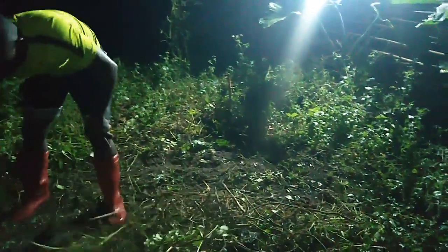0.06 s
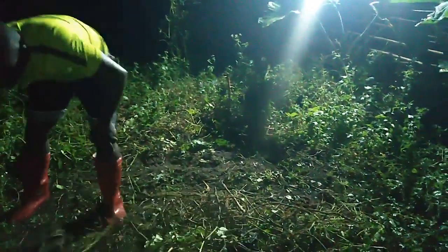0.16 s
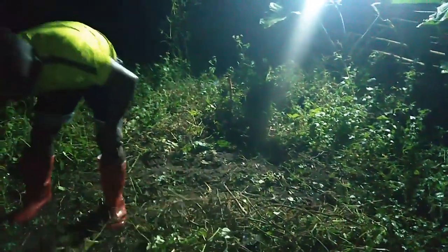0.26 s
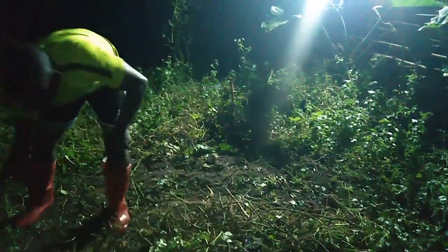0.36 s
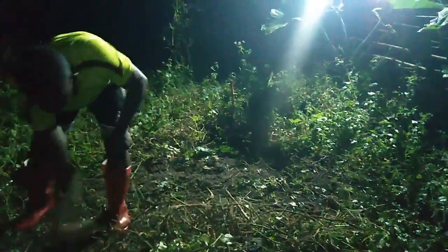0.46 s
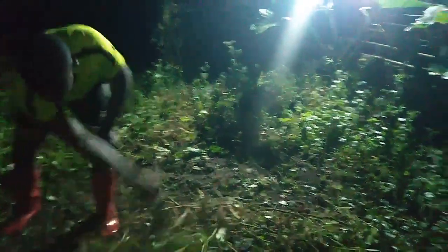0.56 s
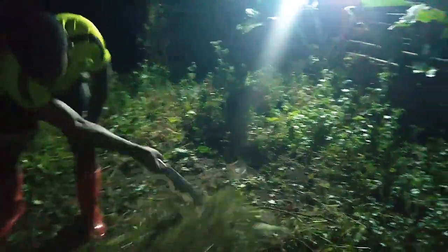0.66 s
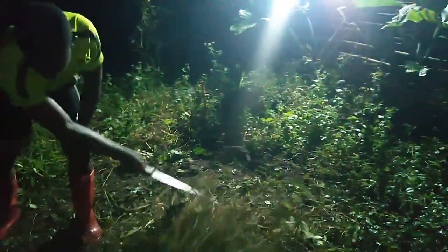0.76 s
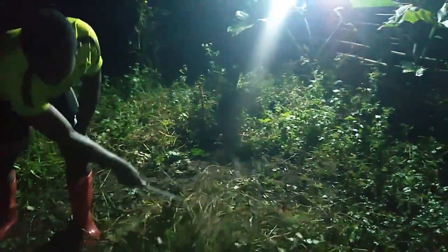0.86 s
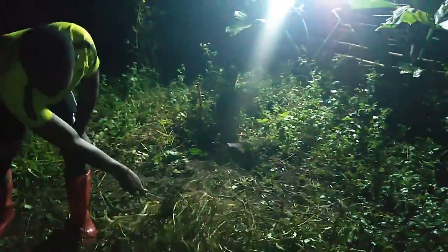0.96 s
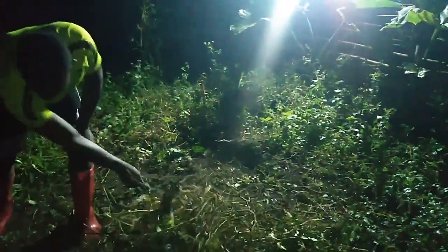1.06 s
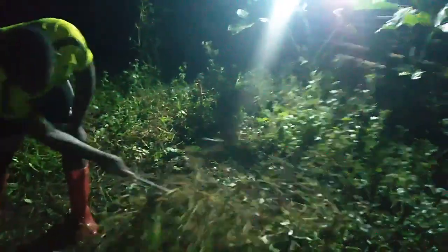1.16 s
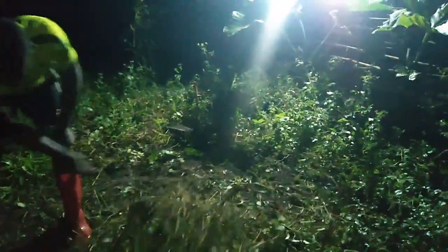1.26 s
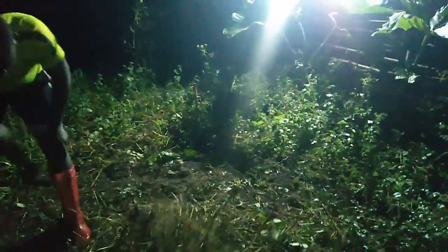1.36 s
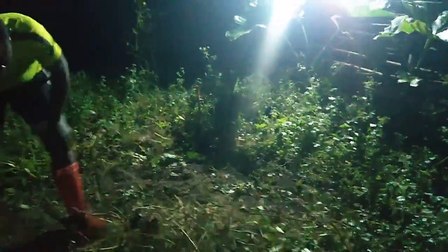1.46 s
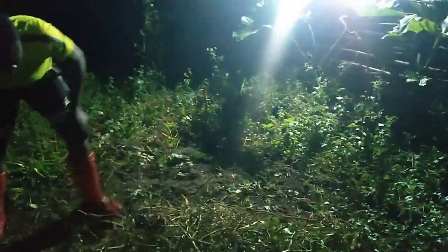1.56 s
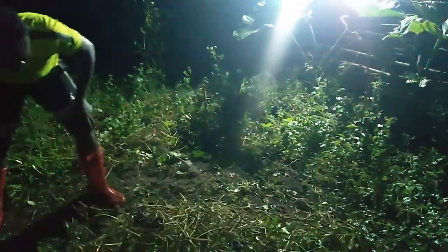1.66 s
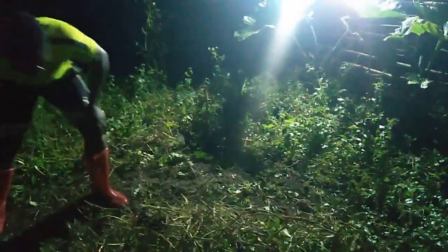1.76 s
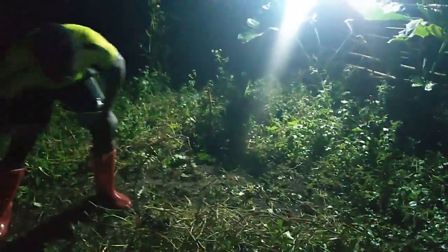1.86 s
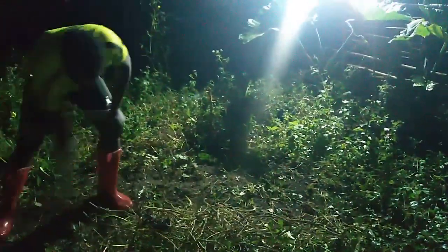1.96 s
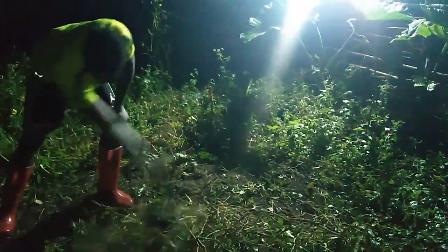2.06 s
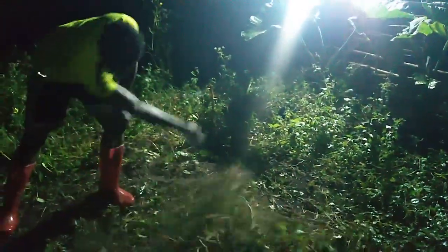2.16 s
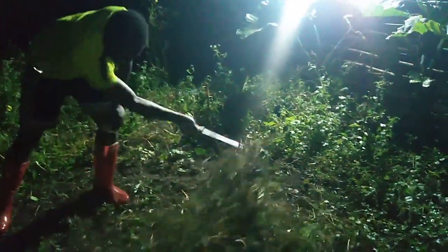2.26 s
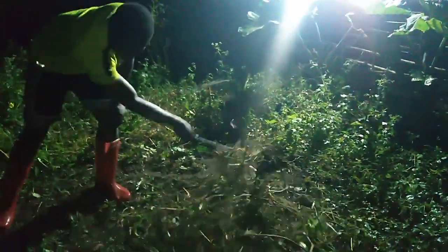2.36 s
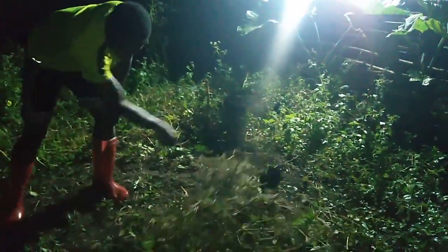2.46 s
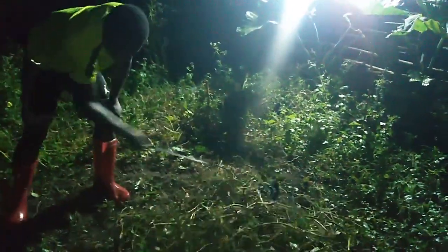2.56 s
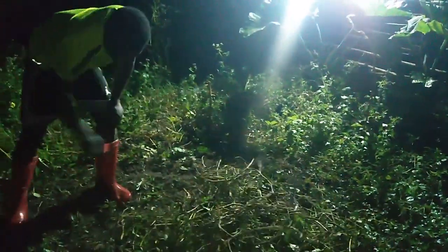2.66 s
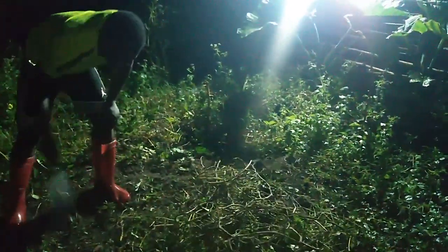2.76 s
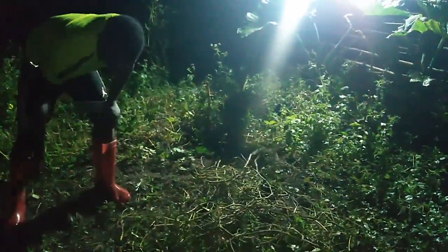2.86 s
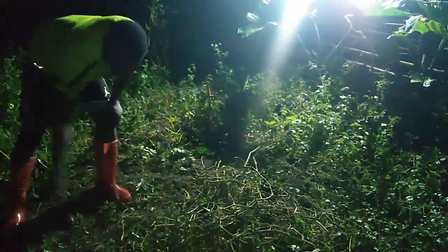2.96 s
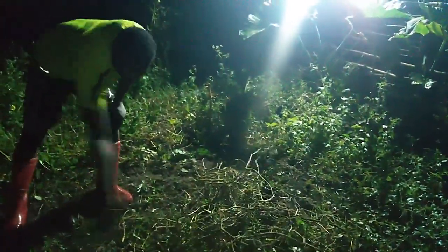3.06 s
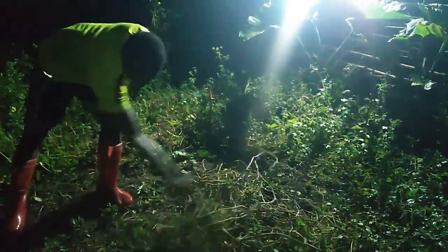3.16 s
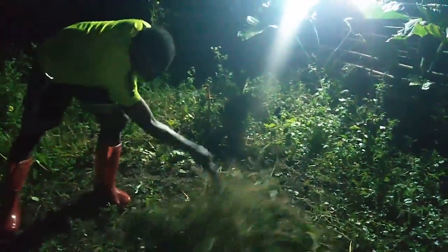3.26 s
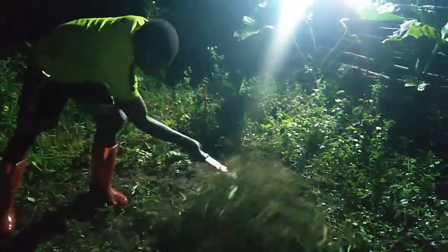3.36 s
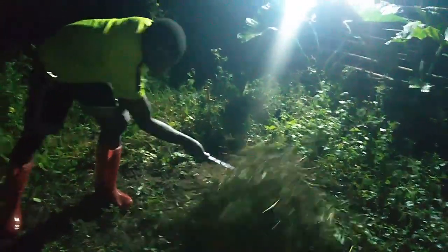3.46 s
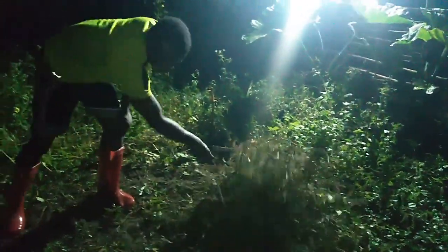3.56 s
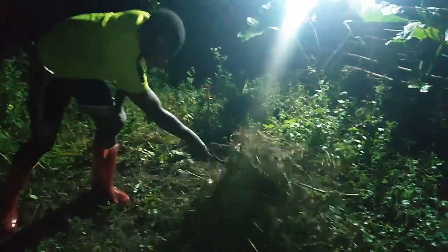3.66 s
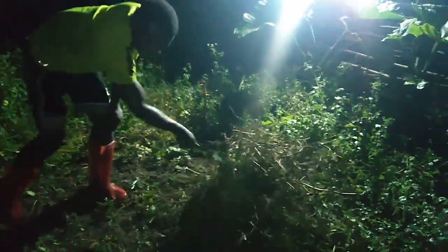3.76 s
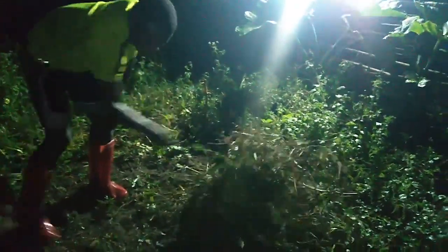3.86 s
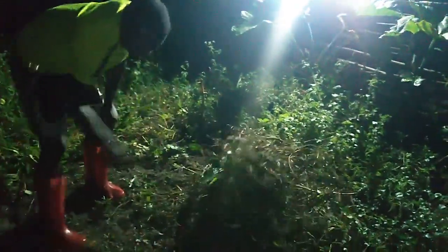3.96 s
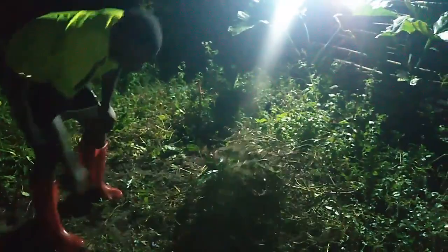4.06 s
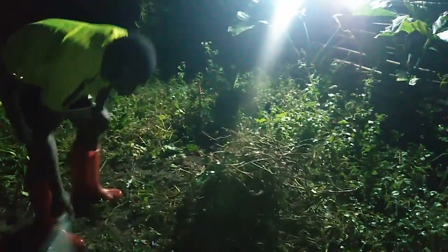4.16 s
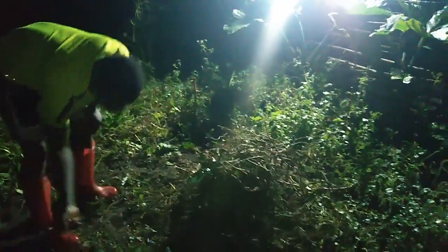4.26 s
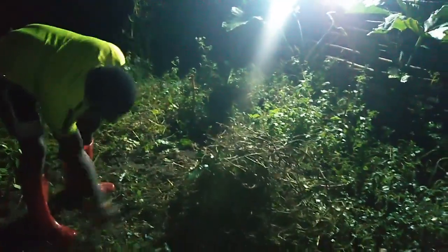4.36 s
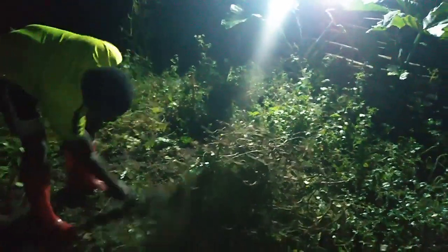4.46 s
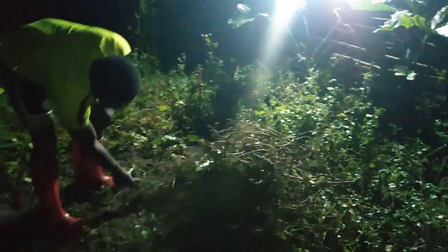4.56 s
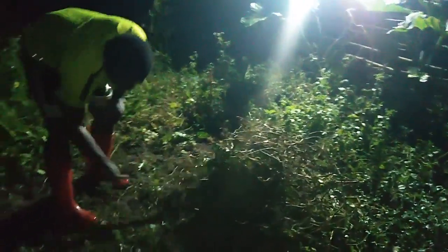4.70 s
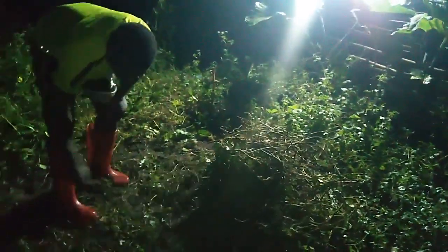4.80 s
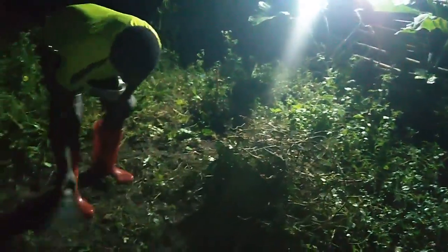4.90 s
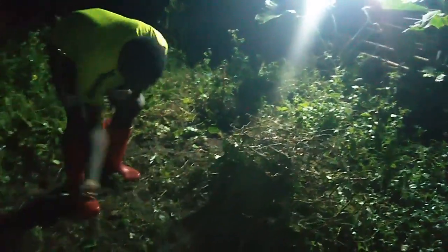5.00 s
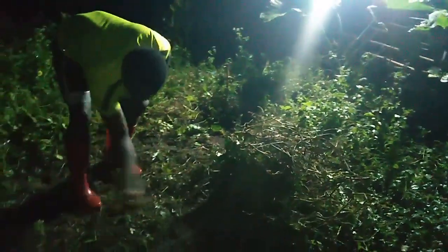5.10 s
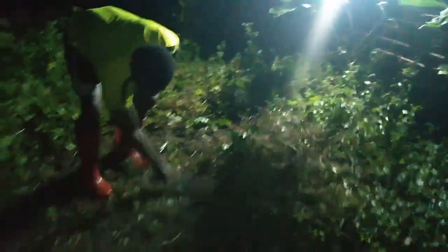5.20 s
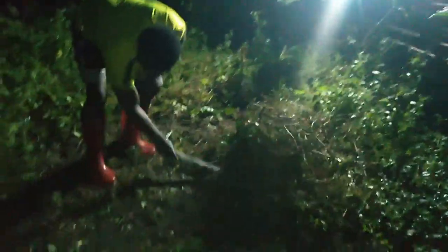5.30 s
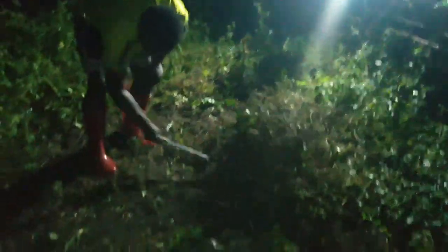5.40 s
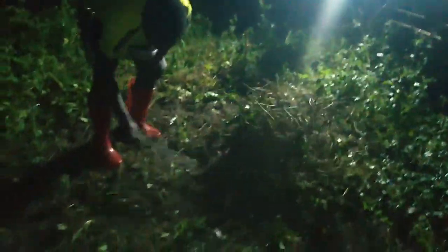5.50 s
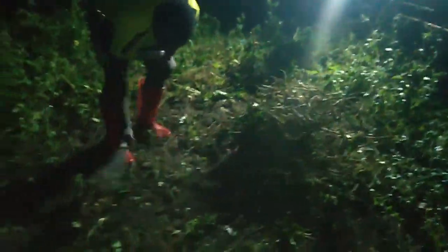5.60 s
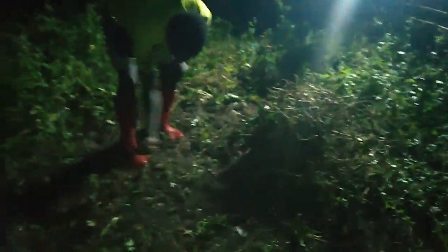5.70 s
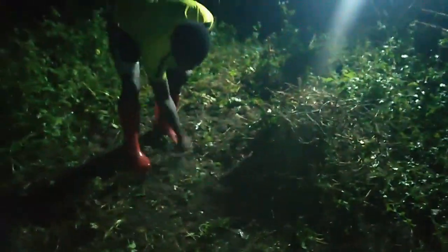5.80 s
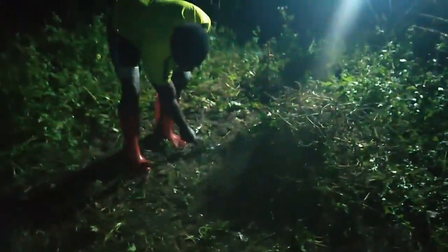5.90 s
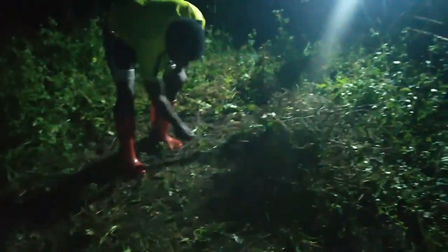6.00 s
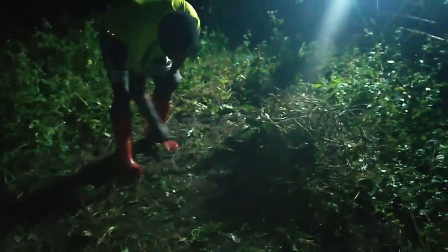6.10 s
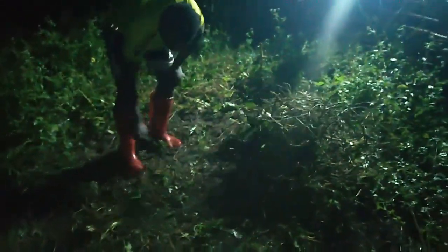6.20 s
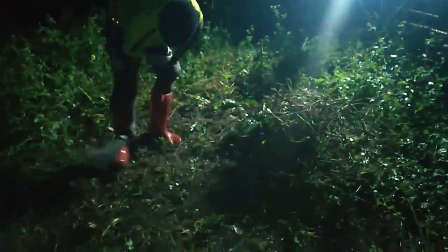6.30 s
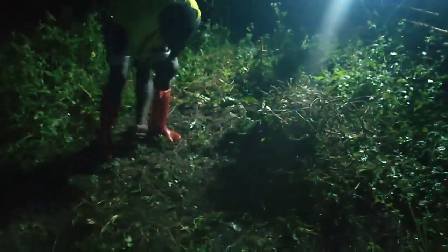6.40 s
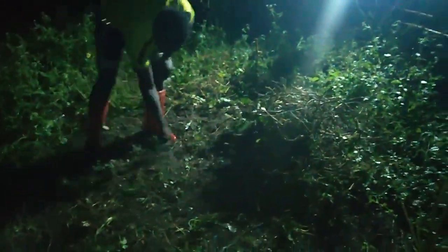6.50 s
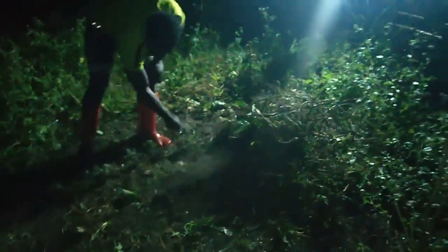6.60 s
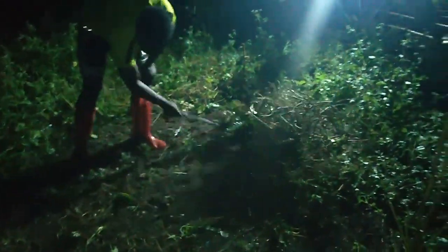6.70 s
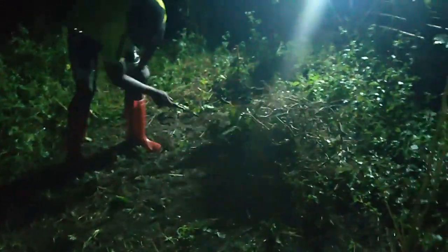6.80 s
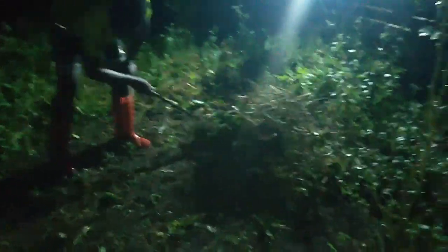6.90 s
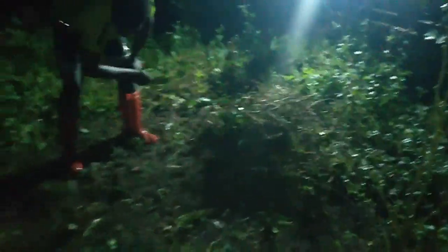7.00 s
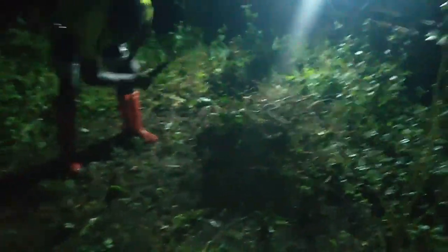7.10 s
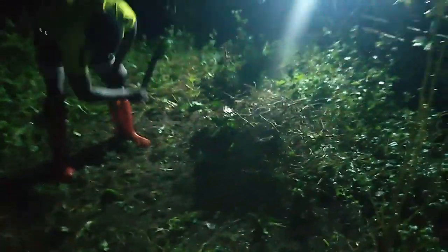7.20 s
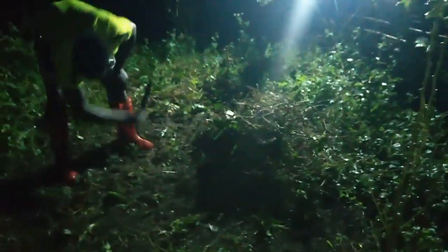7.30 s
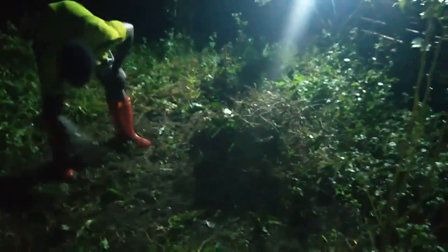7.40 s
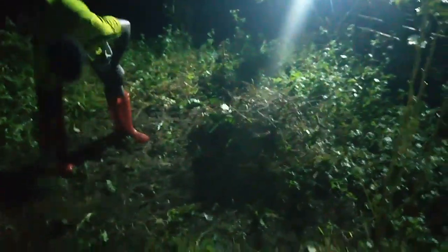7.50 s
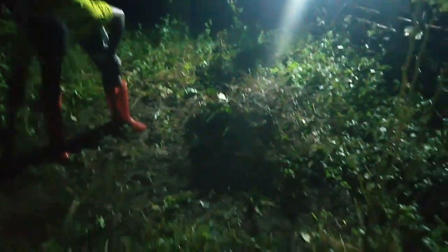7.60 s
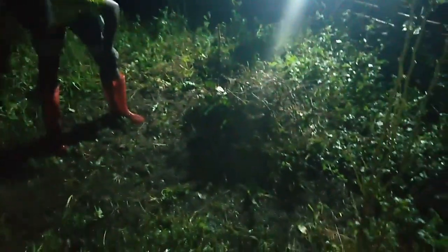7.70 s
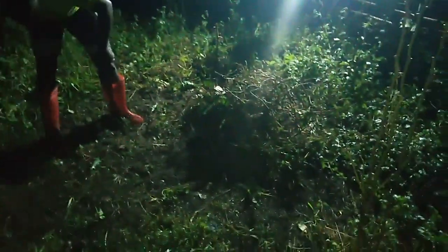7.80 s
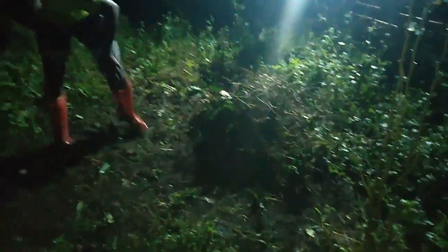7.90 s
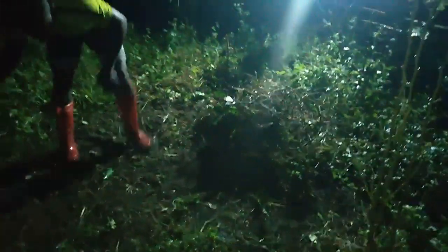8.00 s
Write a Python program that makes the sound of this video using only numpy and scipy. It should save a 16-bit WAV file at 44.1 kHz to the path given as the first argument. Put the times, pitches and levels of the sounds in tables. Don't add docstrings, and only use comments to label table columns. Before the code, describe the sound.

Open ground at night, heard through a handheld phone close to the weeds. From the start an insect on the left chirrs in fast, thin, very high pulses, about 45 a second, over a faint hissy far chorus and low air and traffic rumble. Light litter settles first. At 0.5 s a blade slashes, a sharp bright leafy rip with a stem snap, then falling debris. More slashes land at 2.1 and 3.2 s, the latter into crunchy stems with a long shower of bits. Soft scuffs, dull knocks and faint hollow frog hoots fill the gaps. Hard strokes follow at 4.5 and 5.2, a light flick at 5.8, a heavy thumping one at 5.9, another at 6.6 with grit pattering. A neighbour insect tries short fluttering notes at 1.8 and around 7.4. The loudest, overloaded slash hits at 7.55, then debris fades under the chirring to about 8 s.

```python
import sys
import numpy as np
from scipy import signal
from scipy.fft import rfft, irfft, next_fast_len
from scipy.io import wavfile
from scipy.ndimage import uniform_filter1d

SR = 44100
rng = np.random.default_rng(int(sys.argv[2]) if len(sys.argv) > 2 else 0)


def inscribe(sig):
    pcm = np.round(np.clip(np.atleast_2d(sig).T, -1, 1) * 32767)
    wavfile.write(sys.argv[1], SR, pcm.astype(np.int16))


def boost(x):
    u = np.asarray(x, float) / 20
    return 10 ** u


N = 355005


def evened(x):
    return x / np.sqrt(np.mean(x ** 2) + 1e-20)


def read(points, hz):
    f, value = np.transpose(points)
    return np.interp(np.log(hz + 1), np.log(f + 1), value)


def over_time(points):
    s, value = np.transpose(points)
    return np.interp(np.arange(N) / SR, s, value)


def drift(per_s):
    lowpass = signal.butter(2, per_s, fs=SR, output="sos")
    return evened(signal.sosfilt(lowpass, rng.standard_normal(N + SR))[SR:])


def bump(s, length):
    return np.exp(-(2 * (np.arange(N) / SR - s) / length) ** 2)


def ring(x, hz, width):
    r = np.exp(-np.pi * width / SR)
    poles = [1, -2 * r * np.cos(2 * np.pi * hz / SR), r * r]
    once = signal.lfilter([1, 0, -1], poles, x)
    return evened(signal.lfilter([1], poles, once))


def patches(shape):
    field = rng.standard_normal(shape[::-1]).T
    field = uniform_filter1d(field, size=5, axis=-2)
    return evened(uniform_filter1d(field, size=17, axis=-1))


def patchy(left, right, same, patch_db):
    frames, hz = N // 256 + 5, np.fft.rfftfreq(1024, 1 / SR)
    a, b, c, d = rng.standard_normal((frames, 513, 4)).T
    same = np.clip(same, -1, 1)
    first, other = a + 1j * b, c + 1j * d
    z = np.array([first, same * first + np.sqrt(1 - same ** 2) * other])
    colour_db = np.array([read(left, hz), read(right, hz)])[..., None]
    z *= boost(colour_db + patch_db * patches(a.shape))
    sound = signal.istft(z, nperseg=1024, noverlap=768)[1][:, :N]
    return np.array([evened(v) for v in sound])


def night_air():
    # (f/Hz, level/dB per Hz)
    rumble = [(12, -77), (20, -36), (32, -67.5), (68, 3.5), (97, 7.5), (119, 1), (145, 2), (300, -17.5),
              (405, -28.5), (450, -57), (580, -26.5), (990, -120)]
    # (t/s, level/dB, length/s)
    gusts = [(0.545, -37, 0.029), (1.737, -40, 0.13), (3.24, -37, .04), (2.08, -34, 0.04),
             (4.11, -34.5, .1), (4.094, -35, 0.25), (4.344, -40, .1), (5.918, -23, 0.011),
             (7.004, -39, 0.093), (7.554, -41, .06), (8.003, -43.5, 0.5)]
    steady_db = -43
    swells = sum(boost(2 * db) * bump(s, length) for s, db, length in gusts)
    level = np.sqrt(boost(2 * steady_db) + swells)
    return level * patchy(rumble, rumble, 0.88, patch_db=2.0)


def swept(strokes, hz):
    stroke_s = .009
    t = np.arange(0, stroke_s, 1 / SR)
    teeth = np.hanning(len(t)) * np.sin(2 * np.pi * hz * t)
    return signal.oaconvolve(strokes, teeth / abs(teeth).sum() * 1.6)[:N]


def insect():
    # (t/s, level/dB)
    upper_level = [(0.0, -24.5), (0.61, -25), (1.05, -28), (1.63, -23.5), (1.73, -33), (1.82, -24.5),
                   (2.38, -27.5), (3.38, -25.5), (4.08, -28.5), (5.2, -26.5), (5.63, -31.5), (5.96, -22),
                   (6.14, -31.5), (6.41, -34), (6.7, -27.5), (7.17, -31), (7.6, -23), (8.05, -28.5)]
    # (t/s, level/dB)
    lower_level = [(0.0, -36.5), (0.49, -32), (0.99, -37), (1.46, -29.5), (1.7, -36.5), (2.2, -32),
                   (2.42, -34), (3.47, -36), (3.81, -34.5), (4.12, -34.5), (5.96, -38), (6.1, -43.5),
                   (7.69, -32.5), (8.05, -34)]
    # (f/Hz, width/Hz, level/dB)
    upper_wing = [(7105, 95, 11), (6933, 46, 3.5), (8130, 110, -12.5)]
    # (f/Hz, width/Hz, level/dB)
    lower_wing = [(6132, 43, 17.5), (5951, 63, 16), (6200, 49, -15.5), (6220, 110, 19)]
    pulses_per_s, lowest_hz = 45.2, 5600
    upper_rough, lower_rough = 2.0, 1.1

    turns = np.cumsum(pulses_per_s * (1 + 0.0053 * drift(2.2) + .004 * drift(30))) / SR
    strokes = evened(np.diff(np.floor(turns), prepend=0) * boost(2.0 * drift(15)))
    scrape = evened(np.exp(-(turns % 1) / .7) * rng.standard_normal(N))
    near = 0
    for wing, level, rough in [(upper_wing, upper_level, upper_rough), (lower_wing, lower_level, lower_rough)]:
        rings = 0
        for hz, width, mode_db in wing:
            rings = rings + boost(mode_db) * ring(swept(strokes, hz) + rough * scrape, hz, width)
        near = near + boost(over_time(level) + 7.5 + 1.0 * drift(6.2)) * evened(rings)
    near = signal.sosfilt(signal.butter(6, lowest_hz, "high", fs=SR, output="sos"), near)
    return near * boost([[0], [-32]])


def chorus():
    # (f/Hz, level/dB per Hz)
    left_hiss = [(5400, -58), (5700, 7.5), (6300, 10), (6800, 25), (7400, 8.5), (8100, 7.5), (8400, -29),
                 (8900, -57.5)]
    # (f/Hz, level/dB per Hz)
    right_hiss = [(5000, -42.5), (5600, -34), (6100, 1), (6700, 9), (7400, -41.5), (8000, -20),
                  (8400, -24.5), (8900, -55)]
    out, t = np.zeros((2, N + 800)), np.arange(800) / SR
    for port, when, pitch, size in rng.random((300, 4)):
        note = np.sin(2 * np.pi * (6050 + 1650 * pitch) * t) * np.hanning(len(t))
        out[int(2 * port), int(when * N):][:len(t)] += note * boost(2.0 - 1.2 * np.log(size + .02))
    hiss = patchy(left_hiss, right_hiss, .05, patch_db=-6.5)
    return boost([[-38], [-45]]) * hiss + boost([[-33], [-40]]) * out[:, :N]


def spread(db, mix, weight_db):
    weight_share = np.array((.3, 0.62, 1.12))
    over_leaf_db = mix + weight_db * weight_share
    return boost(2 * db) * boost(2 * np.array([0, *over_leaf_db]))[:, None]


def layer_levels():
    # (t/s, blow level/dB, fade/dB per s, weight/dB)
    blows = [
        (0.532, -18, 152.5, -1),
        (2.107, -17, 136.5, -1.5),
        (3.218, -19, 191, 0),
        (4.479, -14.5, 194, -4),
        (5.225, -14, 119, 0),
        (5.782, -31.5, 903, -6),
        (5.906, -13, 136, 3),
        (6.6, -14, 149, -3),
        (7.558, -11, 185.5, -4),
    ]
    # (level/dB, lasts/s, weight/dB)
    litters = [
        (-26, 1.1, -4),
        (-24, 0.55, 0.5),
        (-25.5, 0.765, 1),
        (-23.5, 1.1, 1.5),
        (-27, 0.688, -0.5),
        (-34.5, 0.44, 1.5),
        (-43, 0.1, -7.5),
        (-36.5, 0.54, -7),
        (-32.5, 0.605, -3.5),
        (-35.5, .6, -3.5),
    ]
    # (t/s, leaf level/dB, length/s, weight/dB)
    rustles = [(0.005, -49, 0.0067, -20), (0.256, -37.5, 0.14, 4), (0.522, -40, .015, -8),
               (0.73, -28.5, 0.032, 2.5), (1.136, -40.5, 0.022, -11), (1.3, -45, 0.36, 4.5),
               (1.475, -55, 0.42, 13), (2.097, -35, 0.007, 0), (2.133, -13, 0.021, -4),
               (2.591, -37.5, 0.15, 2.5), (3.21, -25, 0.0043, 9), (3.242, -20, 0.012, 14),
               (3.596, -47, 0.22, 0), (4.045, -45.5, 0.12, 17.5), (4.443, -47.5, .025, 5),
               (4.475, -22, .006, -8), (5.143, -52, 0.0197, -19), (5.201, -43, .025, -9),
               (5.22, -30.5, 0.011, 9), (5.909, -26, 0.0046, -0.5), (0.55, -11, 0.0086, -16),
               (5.863, -59, 0.06, -36), (6.483, -39.5, 0.04, 11), (6.55, -45.5, .08, 7.5),
               (6.59, -27.5, 0.0041, -1), (6.992, -44, 0.11, -3.5), (7.13, -57, 0.085, -23),
               (7.3, -55.5, 0.016, -16.5), (7.551, -26, 0.0067, 0), (7.554, -18, 0.0034, 5),
               (6.662, -25.5, 0.011, 2), (6.697, -28.5, 0.009, 7.5), (7.674, -33, 0.0081, -1),
               (7.70, -34, 0.0083, 2), (7.79, -49, .05, -13)]
    # (t/s, length/s, stems level/dB, soil level/dB)
    scuffs = [(1.4, 0.034, -40, -58), (1.674, 0.063, -70, -54.5), (1.775, 0.073, -54, -55.5),
              (6.67, 0.12, -37, -47.5), (5.7, 0.064, -52.5, -64), (4.04, 0.049, -52, -41.5),
              (5.11, .1, -57, -72), (5.197, 0.005, -23, -53), (5.38, 0.089, -32, -49),
              (6.6, 0.064, -45, -55), (5.83, 0.046, -51.5, -74.5), (5.8, .04, -44, -80),
              (6.514, 0.048, -40, -55), (7.9, 0.15, -46, -82), (9, .06, -42, -71), (1.21, .15, -48, -59.5),
              (1.75, .12, -59, -51.5), (6.15, 0.095, -50, -61.5), (6.9, .2, -56, -64.5),
              (4.455, 0.013, -44, -71), (4.597, .01, -35, -60)]
    blow_mix, chop_mix = (-1, -10.5, -21.5), (-2.4, -1.7, -12)
    litter_mix, rustle_mix = (0, -1.2, -13), (-3.5, -6, -18.5)
    bite_db_per_s, thin_db_per_s, settle_db_per_s = 4000, 39, 205.5
    chop_db, chop_s = 0.5, 0.012
    earlier_s = -0.28

    power, clock = np.full((4, N), 1e-10), np.arange(N) / SR
    for s, db, fade, weight_db in blows:
        bite_db = bite_db_per_s * np.minimum(clock - s, 0)
        after = np.maximum(clock - s, 0)
        power += spread(db + bite_db - fade * after, blow_mix, weight_db)
        power += spread(db + bite_db + chop_db - 10 * (after / chop_s) ** 2, chop_mix, weight_db)
    starts = [earlier_s] + [row[0] for row in blows]
    for s, (db, lasts, weight_db) in zip(starts, litters):
        bite_db = bite_db_per_s * np.minimum(clock - s, 0)
        after = np.maximum(clock - s, 0)
        thin_db = thin_db_per_s * after + settle_db_per_s * np.maximum(after - lasts, 0)
        power += spread(db + bite_db - thin_db, litter_mix, weight_db)
    for s, db, length, weight_db in rustles:
        power += spread(db, rustle_mix, weight_db) * bump(s, length)
    for s, length, stems_db, soil_db in scuffs:
        power[2:] += boost(2 * np.array([[stems_db], [soil_db]])) * bump(s, length)
    return 10 * np.log10(power)


def litter_spectrum(hz, size):
    # (f/Hz, level/dB per Hz)
    litter_colour = [(90, -39), (200, -19), (450, -16.5), (700, -20.5), (2000, -18), (2650, -15.5),
                     (3200, -14), (4500, -15), (7000, -7), (10000, -6), (13500, -8.5), (15300, -26.5),
                     (16000, -43.5)]
    # (f/Hz, left over right/dB)
    port_lean = [(500, -0.5), (2400, -2.5), (4400, 0), (7000, 0), (9000, 5), (15000, 3.5)]
    # (f/Hz, left-right likeness/1)
    port_same = [(150, 0.46), (640, 0.81), (1400, 0.55), (3000, 0.55), (6000, 0.25), (12000, 0.24)]
    # (f/Hz, phase/rad)
    port_turn = [(200, -0.89), (600, -0.34), (1400, -1.17), (3000, -1.31), (9000, -1.55)]
    # (f/Hz, width/Hz, level/dB)
    port_peak = [(7170, 4000, 11.5), (6065, 1200, 10.5)]
    # (f/Hz, width/Hz, level/dB)
    colour_dip = [(480, 140, -6), (3250, 420, -8)]

    grain_db = 1.6 * np.minimum(rng.exponential(1, (2, N)), 4)
    grains = boost(grain_db) * (rng.random((2, N)) < 6000 / SR)
    a, b = rfft(rng.standard_normal((2, N)) * (2.1 + evened(grains)), size)
    same = np.clip(read(port_same, hz), -1, 1)
    left = a * np.exp(1j * read(port_turn, hz))
    z = np.array([left, same * a + np.sqrt(1 - same ** 2) * b])
    peaks_db = np.array([db / (1 + (2 * (hz - f) / width) ** 2) for f, width, db in port_peak])
    z *= boost(sum(db * np.exp(-(2 * (hz - f) / width) ** 2) for f, width, db in colour_dip))
    lean_db = read(port_lean, hz) * np.array([[.5], [-.5]])
    return z * boost(read(litter_colour, hz) + peaks_db + lean_db)


def slashes():
    # (lowest f/Hz, highest f/Hz)
    layer_hz = [(180, 380), (520, 850), (1000, 3500), (4000, 5400), (5800, 8200), (8800, 14000)]
    size = next_fast_len(N)
    hz = np.fft.rfftfreq(size, 1 / SR)
    z = litter_spectrum(hz, size)
    power = abs(z.mean(0)) ** 2 * 2 / (size * N)
    plain_db = [10 * np.log10(power[(hz > lo) & (hz < hi)].sum()) for lo, hi in layer_hz]

    leaf, grit, stems, soil = layer_levels()
    soil, stems, grit = soil - plain_db[1], stems - plain_db[2], grit - plain_db[3]
    shade_db = np.clip(0.62 * (leaf + 22), -5, 0)
    leaf = leaf - plain_db[-1]
    thump = np.minimum(soil, stems) + 0.44
    ringing = .5 * (grit + leaf) + 0.048

    centres = np.sqrt(np.prod(layer_hz, axis=1))
    out = np.zeros((2, N))
    for k, db in enumerate([thump, soil, stems, grit, ringing, leaf]):
        share = read(list(zip(centres, np.eye(len(centres))[k])), hz)
        out += irfft(z * share, size)[:, :N] * boost([db, db + shade_db * (k > 3)])
    clumps_db = 1.0 * drift(180) + 0.59 * drift(34) - 0.78
    return out * boost(clumps_db)


def ragged(x, patch_db):
    z = signal.stft(x, nperseg=512, noverlap=384)[2]
    field = boost(patch_db * patches(z.shape[1:]))
    return signal.istft(z * evened(field), nperseg=512, noverlap=384)[1][:, :N]


def frogs():
    # (t/s, length/s, f/Hz, level/dB)
    croaks = [(1.395, 0.14, 603, -50), (1.56, 0.03, 900, -48), (1.655, 0.019, 1450, -50),
              (1.762, 0.017, 1515, -48), (2.785, 0.015, 1065, -46), (2.84, 0.018, 1110, -52),
              (2.86, .05, 700, -62.5), (2.98, .05, 680, -64), (3.73, 0.09, 733, -45.5),
              (2.926, 0.034, 1060, -55), (2.929, 0.039, 665, -53), (3.04, .1, 648, -53),
              (3.113, 0.061, 570, -57), (4.218, 0.12, 589, -52.5), (4.198, 0.097, 1440, -57),
              (4.974, 0.048, 990, -57.5), (6.95, .12, 600, -57), (7.076, 0.083, 637.5, -53.5),
              (7.2, 0.081, 1630, -57), (7.85, 0.11, 590, -58), (0.042, 0.023, 800, -45),
              (7.07, 0.059, 920, -56.5), (8.004, .06, 548, -58)]
    out = 0
    for s, length, hz, db in croaks:
        breath = ring(rng.standard_normal(N), hz, 0.12 * hz)
        out = out + boost(db) * np.sqrt(bump(s, length)) * breath
    return out * boost([[1.5], [-1.5]])


def ticks(rows, cycles, puff_s):
    out, t = np.zeros((2, N + 2000)), np.arange(2000) / SR
    for (s, db, hz, pan), noise in zip(rows, rng.standard_normal((len(rows), 2, 2000))):
        snap = np.sin(2 * np.pi * hz * t) * np.exp(-t * hz / cycles) * (1 - np.exp(-t * hz / 0.45))
        band = signal.butter(2, [.6 * hz, min(1.5 * hz, 15000)], "band", fs=SR, output="sos")
        grit = evened(signal.sosfilt(band, noise))
        sound = snap + 0.45 * grit * np.exp(-t / puff_s)
        at = round((s + .0015) * SR)
        out[:, at:at + 2000] += sound * boost(db + pan * np.array([[.5], [-.5]]))
    return out[:, :N]


def snaps():
    # (t/s, peak level/dB, f/Hz, left over right/dB)
    snap_rows = [(0.5382, 3, 11090, 12), (0.7312, -17.5, 9130, 19), (1.2354, -25.5, 9060, 17),
                 (2.0968, -31.5, 9200, 19), (2.1054, -17, 9600, 4.3), (3.2156, -5.5, 10700, 6.5),
                 (3.2281, -1, 10980, 6.5), (5.1113, -43.5, 9700, 35.5), (5.781, -8.5, 8850, 12),
                 (5.878, -27, 8700, 6.7), (6.4727, -17.5, 8240, 9), (6.9132, -26, 8980, 13),
                 (7.1412, -43, 10700, 41), (7.2913, -39.5, 9940, 20), (7.543, -13, 8300, 3.9),
                 (7.5555, 4, 10780, 5), (7.7842, -19.5, 8700, 5), (8.0157, -32.5, 10500, 16)]
    return ticks(snap_rows, cycles=10.0, puff_s=0.0027)


def knocks():
    # (t/s, peak level/dB, f/Hz, left over right/dB)
    knock_rows = [(0.904, -29, 1170, 3), (1.045, -25.5, 2560, 5), (1.254, -32.5, 303, 3),
                  (1.373, -33, 620, 0), (1.698, -33, 328, 3), (1.755, -28.5, 285, -5),
                  (3.318, -3.5, 3440, -2), (3.891, -26.5, 1740, 2), (3.98, -39, 308, -1),
                  (4.04, -17.5, 326, 0), (4.125, -28.5, 318, 2.5), (4.471, -7.5, 2480, 2),
                  (5.197, -19, 895, 6), (5.213, -20, 3920, -6.5), (6.3, -37, 1020, 0),
                  (6.404, -26, 1750, 0.5), (6.423, -15, 1600, -1), (7.806, -27, 2140, -10)]
    return ticks(knock_rows, cycles=2.8, puff_s=.0025)


def patters():
    # (t/s, peak level/dB, f/Hz, left over right/dB)
    patter_rows = [(0.9343, -23, 4600, -4), (2.284, -14, 4500, 9), (2.3794, -20, 4400, 6),
                   (2.7346, -28, 4470, 14), (4.5964, -18, 1520, 3), (6.6537, -5, 6460, 5),
                   (6.6644, -6, 6470, 6), (6.6894, -10, 3200, 5), (6.6974, -10, 6200, 3.5),
                   (6.7287, -12, 6310, 5), (7.6294, -9, 6500, 4), (7.669, -11, 6350, 5),
                   (7.6992, -16, 4300, 7)]
    return boost(-3.5) * ticks(patter_rows, cycles=3.0, puff_s=.003)


def neighbour():
    # (t/s, length/s, f/Hz, level/dB)
    note_rows = [
        (1.835, .04, 6580, -23),
        (7.365, .03, 6400, -28),
        (7.385, 0.044, 6550, -24),
        (7.46, 0.027, 6850, -21.5),
    ]
    t = np.arange(N) / SR
    out = 0
    for s, length, hz, db in note_rows:
        out = out + boost(db) * np.sqrt(bump(s, length)) * np.sin(2 * np.pi * hz * t)
    return out * (1 + .5 * np.cos(2 * np.pi * 120 * t)) * boost([[0], [-20]])


def scene():
    background = night_air() + insect() + chorus()
    weeds = ragged(slashes(), patch_db=1.8)
    hits = snaps() + knocks() + patters()
    return background + weeds + frogs() + hits + neighbour()


def bands(hz):
    edges = [0.]
    while edges[-1] <= hz[-1]:
        edges.append(edges[-1] + np.clip(.085 * edges[-1], 86, 690))
    return np.unique(np.searchsorted(edges, hz, "right"), return_inverse=True)[1]


def mute_weak_bands(x):
    # (f/Hz, level/dB per Hz)
    gate = [(240, -120), (330, -79), (470, -72.5), (650, -87.5), (1500, -80.5), (2500, -80), (2900, -68),
            (3250, -95), (3600, -70.5), (4200, -94.5), (5400, -84.5), (5800, -97), (8300, -91), (8700, -83),
            (11000, -96), (14200, -86.5), (14600, -50.5)]
    # (f/Hz, raised bar/dB)
    right_bar = [(7300, 0), (8000, 11.5), (9500, 3.5), (11500, 3.5), (13000, 10)]
    # (f/Hz, share of time/1)
    starved_share = [(380, 0), (480, .3), (600, .02), (2000, .06), (2800, .04), (3150, .6), (3500, .08),
                     (5000, .01), (7200, 0), (7900, .04), (9000, 0)]

    hz, _, z = signal.stft(x, SR, nperseg=1024, noverlap=768, scaling="psd")
    band = bands(hz)
    member = np.eye(band.max() + 1)[band]
    band_power = (member / member.sum(0)).T @ abs(z) ** 2
    power = uniform_filter1d(band_power[:, band], size=5, axis=2)
    recent = signal.lfilter([.08], [1, -.92], power.mean(axis=1, keepdims=True))
    loud_db = 10 * np.log10(abs(recent) + 1e-14)
    luck = rng.standard_normal((z.shape[2], band.max() + 1, 3)).T
    *wander, starve = evened(uniform_filter1d(luck, size=12, axis=-1))[:, band]

    bar_db = read(gate, hz)[:, None] + np.outer([0, 1], read(right_bar, hz))[..., None]
    bar_db = bar_db + 4.66 * np.array(wander)
    bar_db = bar_db + 0.1 * np.maximum(loud_db + 56.5, 0)
    over_db = 10 * np.log10(abs(power) + 1e-20) - bar_db
    gain_db = -36 / (1 + np.exp(np.minimum(over_db / .6, 40)))
    starved = 1 / (1 + np.exp(1.7 * starve)) < read(starved_share, hz)[:, None]
    z = z * boost(gain_db - 30 * starved)
    return signal.istft(z, SR, nperseg=1024, noverlap=768, scaling="psd")[1][:, :N]


def circuit_hush():
    # (f/Hz, level/dB per Hz)
    left_hush = [(300, -3.5), (450, 2), (1000, -9.5), (3000, -4.5), (5000, -9.5), (9000, -34),
                 (12500, -9.5), (14500, -25)]
    # (f/Hz, level/dB per Hz)
    right_hush = [(300, -3), (450, 4.5), (1000, -9.5), (3000, -4), (5000, -17.5), (9000, -35), (12500, -12),
                  (14500, -25.5)]
    return boost(-63.5) * patchy(left_hush, right_hush, 0.082, patch_db=5.0)


def roll_off(x):
    return signal.sosfilt(signal.butter(12, 15560, fs=SR, output="sos"), x)


def record(dry):
    low_cut = signal.butter(2, 55, "high", fs=SR, output="sos")
    quiet = mute_weak_bands(signal.sosfilt(low_cut, dry)) + circuit_hush()
    band_limit = signal.firwin(511, 15600, window=("kaiser", 9), fs=SR)
    limited = signal.oaconvolve(quiet, band_limit[None], "same")
    return roll_off(np.clip(limited, -1, 1))


dry = scene()
out = record(dry)
inscribe(out)
```